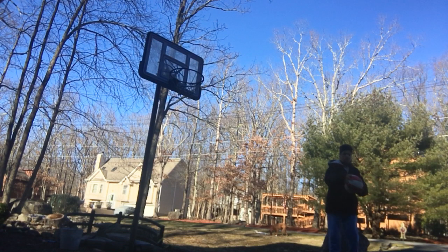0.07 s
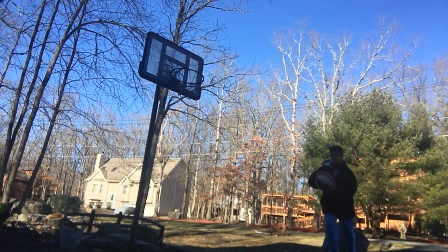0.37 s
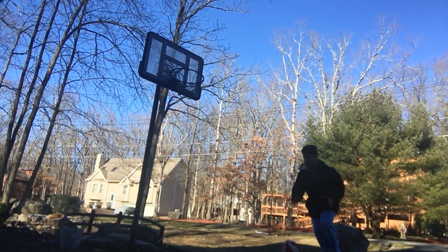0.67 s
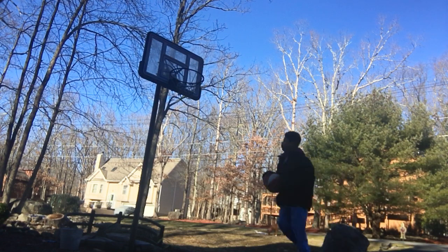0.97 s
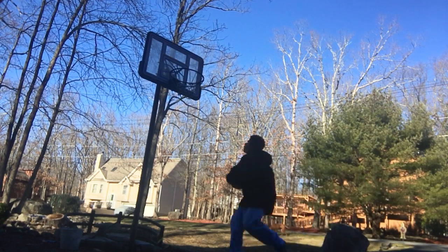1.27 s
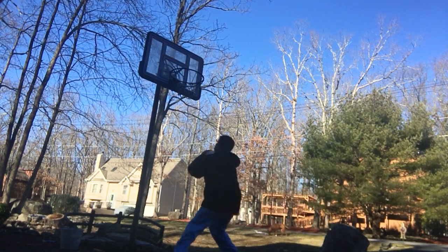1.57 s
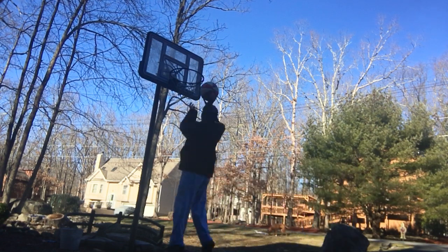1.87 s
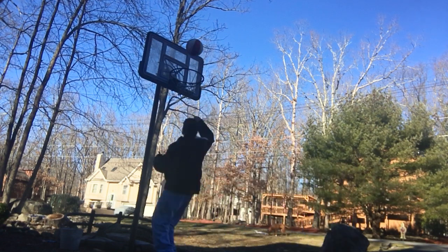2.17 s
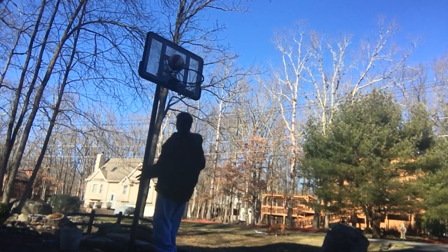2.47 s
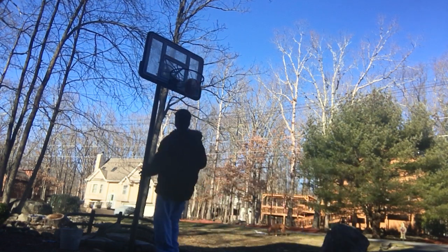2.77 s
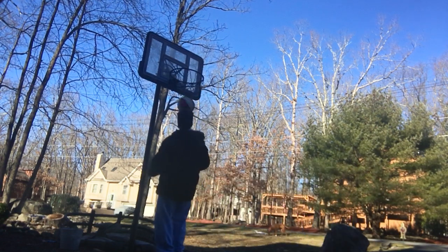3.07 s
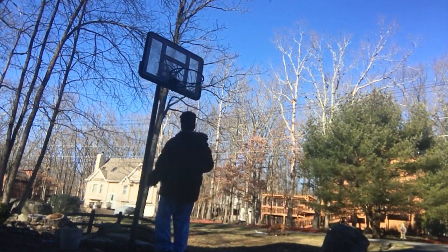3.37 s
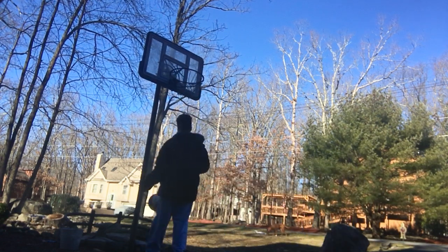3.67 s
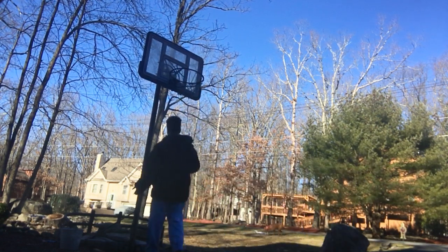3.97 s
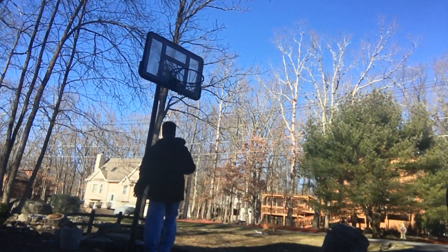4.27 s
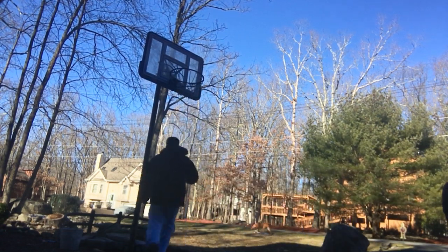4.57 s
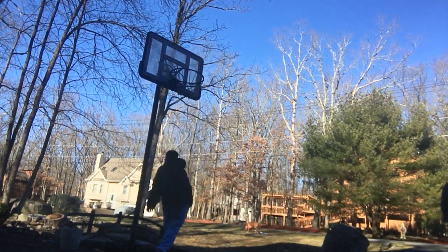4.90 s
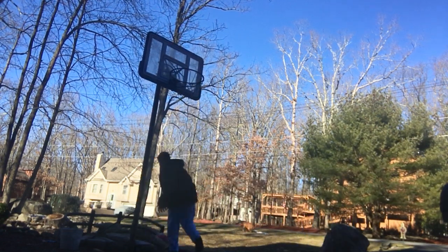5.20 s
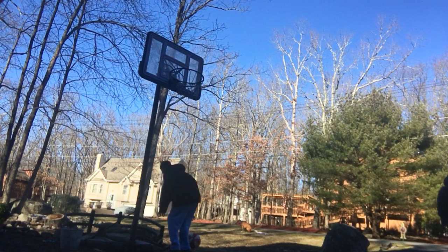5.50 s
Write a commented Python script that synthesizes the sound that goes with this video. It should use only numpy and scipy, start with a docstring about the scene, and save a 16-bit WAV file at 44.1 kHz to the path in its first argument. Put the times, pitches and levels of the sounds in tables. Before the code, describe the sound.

Low wind rumbles and buffets the microphone in a quiet yard, strongest in the first two seconds and then easing. At about 0.7 seconds a basketball bounces once on the driveway, the loudest sound: a sharp rubber slap with an airy ping and a thump. Faint shoe scuffs, hand pats on the ball and jacket rustle follow, with two barely audible bird chirps near 1.4 and 2 seconds. At 2.5 seconds the ball booms on the backboard, rattling the bracket and leaving the rim humming faintly. The net swishes softly at 2.8 seconds. The ball bounces on the ground at 3.6 seconds and again, softer and duller, at 4.5. From 5.1 to 5.4 seconds it knocks several times against the hoop's hollow plastic base with a twangy clatter, followed by light gritty scuffs. Each impact leaves a short outdoor echo.

```python
"""Wind buffets the microphone, shoes scuff on a gritty driveway and a basketball is bounced and caught.
A lay-up booms on the backboard and swishes through the net; the ball bounces twice more and knocks
against the hoop's hollow plastic foot. Each bounce is a slap of rubber, a ping of the air inside and
a thump of the shell. A jacket rustles, the woods hush, a far bird whistles, house and trees echo."""
import sys
import numpy as np
from scipy import signal
from scipy.fft import rfft, irfft
from scipy.io import wavfile
from scipy.ndimage import uniform_filter1d

SR = 44100
rng = np.random.default_rng(int(sys.argv[2]) if len(sys.argv) > 2 else 0)


def waveform_to_disk(signal):
    """Save audio, clipped to [-1, 1], as 16-bit WAV at the path in sys.argv[1]."""
    frames = np.transpose(np.atleast_2d(signal))
    scaled = np.clip(frames, -1, 1) * 32767
    samples = np.round(scaled).astype(np.int16)
    wavfile.write(sys.argv[1], SR, samples)


N = 244314
TIME = np.arange(N) / SR
AGE = TIME[:SR // 2]  # seconds into one short event
MIDDLE = AGE.mean()


def amp(db):
    """Turns decibels into a gain."""
    return 10 ** (np.asarray(db) / 20)


def unit(x):
    """Scales to an average (rms) level of 1."""
    return x / np.sqrt(np.mean(x ** 2) + 1e-20)


def read(points, hz):
    """Reads between a table's rows on a log-frequency axis."""
    f, value = np.transpose(points)
    return np.interp(np.log(hz + 1), np.log(f + 1), value)


def add(mix, s, sound):
    """Mixes a sound in at s seconds."""
    start = round(s * SR)
    sound = sound[max(-start, 0):]
    part = mix[max(start, 0):][:len(sound)]
    part += sound[:len(part)]


def bins(size=len(AGE)):
    """The frequencies of a spectrum, in Hz."""
    return np.fft.rfftfreq(size, 1 / SR)


def coloured(x, gain):
    """Filters x with one gain per frequency, then scales it to level 1."""
    return unit(irfft(rfft(x) * gain, len(x)))


def white(size=len(AGE)):
    """Plain white noise."""
    return rng.standard_normal(size)


def noise(spectrum, size=len(AGE)):
    """Noise with the given spectrum."""
    return coloured(white(size), amp(read(spectrum, bins(size))))


def grains(spread_db, size=len(AGE)):
    """Dense tiny clicks of uneven size."""
    clicks = white(size) * amp(spread_db * np.minimum(rng.exponential(1, size), 4))
    return clicks * (rng.random(size) < .1)


def fade(t60):
    """Dies away by 60 dB in t60 seconds, the fade time."""
    return np.exp(-np.log(1000) * AGE / t60)


def attack(rise):
    """Climbs from 0 towards 1, most of the way in rise seconds."""
    return 1 - np.exp(-AGE / rise)


def swell(half_length, middle=MIDDLE, time=AGE):
    """A bell-shaped rise and fall in level."""
    return np.exp(-.5 * ((time - middle) / half_length) ** 2)


def ring(tones, rise, uneven_db=0, scatter=0):
    """Dying tones; uneven_db and scatter vary their strength and phase from blow to blow."""
    chance = rng.standard_normal((len(tones), 2))
    out = sum(amp(db + uneven_db * a) * fade(t60) * np.sin(2 * np.pi * hz * AGE + scatter * b)
              for (hz, db, t60), (a, b) in zip(tones, chance))
    return out * attack(rise)


def click(gain):
    """A sudden (minimum-phase) click with the given spectrum and a peak of 1."""
    log_gain = np.log(np.maximum(gain, 1e-5))
    mirrored = np.r_[log_gain, log_gain[-2:0:-1]]
    pulse = np.fft.ifft(np.exp(np.conj(signal.hilbert(mirrored)))).real
    return pulse / abs(pulse).max()


def patchy(x, depth_db, size):
    """Lets the level wander in small patches of time and frequency."""
    bands = signal.stft(x, SR, nperseg=512)[2]
    patches = uniform_filter1d(white(bands.shape), size, axis=0)
    patches = unit(uniform_filter1d(patches, size, axis=1))
    return unit(signal.istft(bands * amp(depth_db * patches), SR, nperseg=512)[1][:len(x)])


def echoed(x, tail):
    """Smears x through a tail of echoes."""
    return signal.fftconvolve(x, tail / np.linalg.norm(tail))[:N]


def snap(pitch_hz):
    """One short dry snap around a pitch."""
    octaves = np.log2((bins() + 1) / pitch_hz)
    return coloured(white(), 1 / (1 + (1.74 * octaves) ** 4)) * (fade(0.0069) + 0.049 * fade(0.133))


# The hush of the woods. Each row: frequency in Hz, relative level in dB.
WOODS_COLOUR = [(88, -29.5), (150, -9.5), (253, -1.5), (320, -12), (411, -6), (471, -16), (985, -11.5),
                (1630, -22), (3410, -29), (9360, -37.5), (10300, -41.5), (13300, -38.5), (15500, -45)]
# How the whine comes and goes. Each row: time in seconds, share of its full level.
WHINE_LEVELS = [(.4, 0.076), (.9, 1), (2.0, 1), (2.5, 0)]

def woods(hush_db=-70.5, whine_hz=1178, whine_width_hz=20, whine_db=-76.5):
    """A steady distant hush and a faint far whine."""
    hush = amp(hush_db) * noise(WOODS_COLOUR, N)
    whine = coloured(white(N), np.exp(-((bins(N) - whine_hz) / whine_width_hz) ** 2))
    return hush + amp(whine_db) * whine * np.interp(TIME, *np.transpose(WHINE_LEVELS))


# Bird calls. Each row: start and length in seconds, first and last pitch in Hz, level in dB.
BIRD_CALLS = [(1.44, 0.034, 2140, 2220, -73), (2.037, .085, 2050, 3200, -72)]

def bird():
    """Two thin rising whistles from the trees."""
    out = np.zeros(N)
    for s, length, start_hz, end_hz, db in BIRD_CALLS:
        hz = np.linspace(start_hz, end_hz, round(length * SR))
        add(out, s, amp(db) * np.hanning(len(hz)) * np.sin(2 * np.pi * np.cumsum(hz) / SR))
    return out


# The wind's rumble. Each row: frequency in Hz, relative level in dB.
RUMBLE_COLOUR = [(20, -30.5), (35, -2.5), (55, 11), (80, 8), (120, 1.5), (170, -7.5), (250, -20),
                 (400, -31.5), (900, -69)]
# Gusts. Each row: time of the peak in seconds, level in dB, half length in seconds.
WIND_GUSTS = [(0.12, -39, 0.12), (0.732, -36, 0.05), (1.255, -42, .13), (2.5, -49, .15)]
# The hardest swirls of air. Each row: time of the peak in seconds, level in dB, upper edge in Hz.
WIND_BUFFETS = [(.114, -39, 217), (.182, -34, 190), (.675, -36, 135), (.782, -40, 198), (1.028, -39, 196),
                (1.142, -33.5, 186), (1.224, -38.5, 137), (1.343, -38, 200), (1.392, -36, 238),
                (1.563, -40.5, 127), (1.604, -38, 139), (1.674, -42.5, 128), (1.917, -47.5, 133),
                (2.393, -42.5, 147)]

def wind(breeze_db=-51, fall_db_per_s=2.16, lumpy_db=3.0, low_hz=54, half_length_cycles=1.85):
    """Air swirls at the microphone: a dying breeze rumbles, with gusts and short buffets on top."""
    lumps = coloured(white(N), np.exp(-(bins(N) / 18) ** 2))
    breeze_power = amp(breeze_db - fall_db_per_s * TIME) ** 2
    gust_power = sum((amp(db) * swell(half, s, TIME)) ** 2 for s, db, half in WIND_GUSTS)
    rumble = unit(noise(RUMBLE_COLOUR, N) * amp(lumpy_db * lumps))
    out = np.sqrt(breeze_power + gust_power) * rumble
    hz = bins()
    bass = (hz / low_hz) ** 3 / (1 + (hz / low_hz) ** 3) / np.sqrt(1 + hz / 70)
    for s, db, edge_hz in WIND_BUFFETS:
        shape = swell(half_length_cycles / edge_hz)
        eddy = shape * coloured(white(), bass / (1 + (hz / edge_hz) ** 4.5))
        add(out, s - MIDDLE, amp(db) * eddy * np.linalg.norm(shape) / np.linalg.norm(eddy))
    return out


# How long the yard echoes. Each row: frequency in Hz, fade time in seconds.
YARD_FADES = [(100, 0.66), (400, 0.33), (1000, 0.2), (3000, 0.27), (6000, 0.26), (12000, 0.176)]
# The tone of that echo. Each row: frequency in Hz, relative level in dB.
ECHO_COLOUR = [(60, -11.5), (250, 0), (600, 1.5), (1200, -4.5), (3200, -4), (6000, -3.5), (12000, -2)]

def yard_echo(x, echo_db=-16):
    """Scattered echoes from the house and the trees, each band dying at its own speed."""
    hz, t, bands = signal.stft(white(), SR, nperseg=256)
    bands = bands * np.exp(-np.log(1000) * t / read(YARD_FADES, hz)[:, None])
    bands *= amp(read(ECHO_COLOUR, hz))[:, None]
    tail = signal.istft(bands, SR, nperseg=256)[1][:len(AGE)] * attack(0.01)
    return amp(echo_db) * echoed(x, tail)


# Dry leaves, also used for cloth. Each row: frequency in Hz, relative level in dB.
RUSTLE_COLOUR = [(300, -4.5), (1100, 0.5), (2000, -1.5), (3700, -4.5), (5000, -13.5), (7000, -18),
                 (10000, -24.5), (15000, -25.5)]

def tree_echo(x, echo_db=-35):
    """A faint late echo comes back from the trunks and dry leaves."""
    return amp(echo_db) * echoed(x, noise(RUSTLE_COLOUR) * fade(0.8) * attack(0.028))


# When the player moves. Each row: start and end in seconds, rustle level in dB.
PLAYER_MOVES = [(0, 0.12, -78.5), (.55, 2.3, -79), (4.95, 6.1, -84.5)]

def jacket(leaves_db=-85, ease_s=0.058, snaps_per_s=4, snap_db=-70.5, snap_hz=3500):
    """Cloth rustles and grit snaps faintly while the player moves; in between, dry leaves stir."""
    level, snaps = amp(leaves_db), np.zeros(N)
    for start, end, db in PLAYER_MOVES:
        seconds_outside = np.maximum(np.maximum(start - TIME, TIME - end), 0)
        level = level + amp(db) * np.exp(-seconds_outside / ease_s)
    fibres = coloured(grains(spread_db=2.0, size=N), amp(read(RUSTLE_COLOUR, bins(N))))
    rustle = level * patchy(fibres, depth_db=1.6, size=4)
    for start, end, _ in PLAYER_MOVES:
        for _ in range(round(snaps_per_s * (end - start))):
            extra_db, octaves = rng.normal(0, [3, .6])
            add(snaps, rng.uniform(start, end), amp(snap_db + extra_db) * snap(snap_hz * 2 ** octaves))
    return rustle + snaps


# A scrape. Each row: frequency in Hz, relative level in dB.
SCRAPE_COLOUR = [(200, -4), (1000, 3), (2200, 0), (4000, 0.5), (6000, -5.5), (9000, -9.5), (10500, -14.5),
                 (13000, -15), (16000, -19)]

def scrape(tilt_db):
    """Grainy rubbing, brighter with more tilt."""
    colour = amp(read(SCRAPE_COLOUR, bins()) + tilt_db * np.log2(bins() + 1))
    return patchy(coloured(grains(spread_db=2.0), colour), depth_db=3.0, size=3)


# A dull knock, for pats and the hoop's bracket. Each row: frequency in Hz, relative level in dB.
KNOCK_COLOUR = [(80, 2), (250, 11.5), (450, 1), (850, 1.5), (1400, -13), (2500, -21.5), (6000, -35),
                (15000, -57)]
# Soles landing, hands patting and catching the ball. Each row: start in seconds, relative pat level
# in dB, length in seconds, scuff level in dB, scuff tilt in dB per octave.
PATS = [(0.021, -55, 0.037, -74.5, -1), (0.419, -61, 0.028, -64.5, -3), (.48, -59.5, .055, -78, -8),
        (0.896, -51.5, .028, -61, -1), (0.949, -63, 0.056, -68, -0.5), (1.396, -57, 0.068, -73, -3),
        (1.548, -58.5, 0.035, -65, 2), (1.794, -54, 0.074, -58, -2.5), (2.097, -57.5, .03, -69, -3),
        (3.349, -67.5, .05, -88, -6), (3.852, -61.5, 0.023, -90, -3), (3.949, -56, 0.022, -77, -4.5),
        (4.948, -57.5, 0.046, -79, -3.5)]
# A shoe drags or a sleeve brushes. Each row: middle in seconds, level in dB, half length in seconds,
# tilt in dB per octave.
DRAGS = [(1.221, -69.5, 0.0075, 1), (1.719, -66.5, .029, -0.5), (2.249, -72, 0.067, 1.2),
         (4.423, -65, 0.011, 1.3), (5.362, -64.5, 0.011, 1), (5.458, -58, 0.0048, -2.5),
         (5.515, -64.5, 0.016, -3)]
# Grit underfoot and hands smacking the ball. Each row: start in seconds, level in dB, pitch in Hz.
SNAPS = [(0.024, -59, 1800), (.421, -62.5, 1500), (.513, -52.5, 1940), (.902, -56.5, 1080),
         (1.711, -59, 5100), (1.822, -53, 1400), (2.105, -56, 990), (2.9537, -52, 4900), (3.235, -63, 1980),
         (3.842, -56, 5650), (4.424, -51.5, 3900), (5.407, -52.5, 3380)]

def shoes_and_hands(scuff_peak=0.38, scuff_width=0.31):
    """Soles on grit and hands on the ball make dull pats, scuffs and short dry snaps."""
    out = np.zeros(N)
    for s, pat_db, length, scuff_db, tilt_db in PATS:
        pat_shape = attack(0.1 * length) * np.exp(-AGE / (0.57 * length))
        add(out, s, amp(pat_db + 5) * noise(KNOCK_COLOUR) * pat_shape)
        scuff = swell(scuff_width * length) * scrape(tilt_db)
        add(out, s + scuff_peak * length - MIDDLE, amp(scuff_db) * scuff)
    for s, db, half_length, tilt_db in DRAGS:
        add(out, s - MIDDLE, amp(db) * swell(half_length) * scrape(tilt_db))
    for s, db, pitch_hz in SNAPS:
        add(out, s, amp(db) * snap(pitch_hz))
    return out


# The net's swish. Each row: frequency in Hz, relative level in dB.
NET_COLOUR = [(200, -8.5), (600, -7.5), (950, 0.5), (1140, 2), (1400, 0.5), (1700, -7.5), (2200, -10),
              (3200, -18), (7000, -27.5), (9000, -27), (10500, -27), (13000, -28), (16000, -39)]

def net(s=2.773, db=-53.0):
    """The ball drags through the cords."""
    out = np.zeros(N)
    add(out, s - MIDDLE, amp(db) * swell(half_length=0.018) * noise(NET_COLOUR))
    return out


# Knocks on the hoop's foot. Each row: start in seconds, then relative clatter, thud and twang in dB.
FOOT_KNOCKS = [(5.1423, -44.5, -41.5, -68), (5.166, -50.5, -42, -48.5), (5.191, -45, -47.5, -50),
               (5.2205, -50, -41.5, -65), (5.3124, -40, -61, -35.5), (5.41, -66, -46.5, -47)]
# The hollow foot. Each row: pitch in Hz, relative level in dB, fade time in seconds.
FOOT_TONES = [(71, -5, 0.11), (134, 1.5, 0.092), (201.3, -4, 0.093), (282, -9, 0.085), (383, -17.5, 0.13)]
# Clattering plastic. Each row: frequency in Hz, relative level in dB.
CLATTER_COLOUR = [(150, 2.5), (400, -3.5), (650, -9), (1050, 3.5), (1800, -9.5), (2500, -5), (3300, -18.5),
                  (4400, -16), (6000, -31), (15000, -42.5)]

def hoop_foot(start_hz=2200, fall_s=0.00087):
    """The ball knocks on hollow plastic; bending waves arrive by many paths as a rough twang."""
    out = np.zeros(N)
    # high bending waves travel faster and arrive first, so the pitch sinks
    turns = np.cumsum(start_hz / np.sqrt(1 + AGE / fall_s)) / SR
    falling_tone = np.sin(2 * np.pi * turns) * fade(0.32)
    clatter_shape = (fade(0.026) + 0.31 * fade(0.24)) * attack(0.00039)
    for s, clatter_db, thud_db, twang_db in FOOT_KNOCKS:
        add(out, s, amp(clatter_db) * noise(CLATTER_COLOUR) * clatter_shape)
        add(out, s, amp(thud_db + 3) * ring(FOOT_TONES, rise=0.0049, uneven_db=4.5, scatter=0.76))
        paths = white() * fade(0.096)
        add(out, s, amp(twang_db - 6.5) * echoed(falling_tone, paths))
    return out


# The lay-up. Each row: start in seconds, then relative crack, board, bracket and rim levels in dB.
LAYUP_HITS = [(2.4947, -45, -36, -53, -71), (2.5174, -59, -32, -44.5, -61.5),
              (2.5246, -71, -28.5, -36, -56.5), (2.5694, -72.5, -43, -36, -67), (2.627, -64, -56, -60, -61),
              (2.861, -96, -61, -52, -56.5), (2.919, -84, -72, -57, -56)]
# The hoop's three ringing parts. Each row: pitch in Hz, relative level in dB, fade time in seconds.
BOARD_TONES = [(54.2, -8, 0.19), (76.6, -3.5, .13), (105.3, 3, 0.071), (170, -6.5, 0.11), (266, -12, 0.073),
               (346, -6, 0.065), (394, -14.5, 0.084)]
BRACKET_TONES = [(646.6, -17.5, 0.24), (768, -12, 0.038), (1042, -2, 0.046), (1163, 1.5, 0.036),
                 (1295, -8, 0.07), (1418, 5, 0.027), (1530, -3.5, 0.045), (2114, -16.5, 0.059)]
RIM_TONES = [(280, -15.5, 1.9), (348, -3.5, 0.24), (371, 6, 0.12)]
# The ball's crack on board or grit. Each row: frequency in Hz, relative level in dB.
CRACK_COLOUR = [(200, -17.5), (1000, 6), (3200, -0.5), (5000, -14), (7500, -12), (10000, -20.5),
                (15000, -34.5)]

def hoop(roughness=0.37):
    """The ball cracks on the board, which booms and shakes its loose bracket; the rim hums on."""
    out = np.zeros(N)
    for s, crack_db, board_db, bracket_db, rim_db in LAYUP_HITS:
        add(out, s, amp(crack_db) * noise(CRACK_COLOUR) * (fade(0.01) + 0.3 * fade(0.2)))
        add(out, s, amp(board_db) * ring(BOARD_TONES, rise=0.0026, uneven_db=4.5, scatter=0.77))
        chatter = 1 + roughness * unit(uniform_filter1d(white(), size=90))
        rattle = chatter * ring(BRACKET_TONES, rise=0.0014, uneven_db=5.0, scatter=2.1)
        clatter = noise(KNOCK_COLOUR) * fade(0.31) * attack(0.0036)
        add(out, s, amp(bracket_db - 5) * rattle + amp(bracket_db - 17) * clatter)
        add(out, s, amp(rim_db) * ring(RIM_TONES, rise=0.0064, scatter=0.46))
    return out


# The rubber's slap. Each row: frequency in Hz, relative level in dB.
SLAP_COLOUR = [(100, -2), (500, -11.5), (1000, -3.5), (2000, 2), (3300, 5), (4500, -3), (6000, -3),
               (8000, -15), (9000, -16), (11000, -31), (15000, -22)]
# The air inside the ball, then the shell overtones that a hard throw stirs.
# Each row: pitch in Hz, relative level in dB, fade time in seconds.
AIR_TONES = [(630, -7, 0.1), (702, -2.5, 0.084), (786, -1, 0.0583), (970, -0.5, 0.095), (1070, -8.5, 0.059),
             (1186, 2, 0.074), (1340, -8.5, 0.071), (1560, -3.5, 0.12), (1760, -4, .05), (1940, -16, .045),
             (2060, -14.5, 0.16), (2215, -10, 0.039), (2633, 1, .045), (2800, -4.5, .055),
             (2880, -9, 0.044), (3236, -10.5, .05), (3490, -11.5, .035), (3820, -3, .03),
             (4150, -14, 0.0535), (5350, -15.5, .04), (5780, -18, .025)]
OVERTONES = [(254.4, -1.5, 0.11), (268.7, -4.5, 0.0878)]
# The shell. Each row: multiple of the thump pitch, relative level in dB, fade time in seconds.
SHELL_TONES = [(.5, -14.5, 0.19), (.78, -14.5, 0.072), (1, -0.5, 0.079), (1.1, -11, 0.07), (2.0, -28, 0.24),
               (2.6, -9.5, 0.047), (3.2, -16.5, 0.078)]
# Bounces. Each row: start in seconds, slap in dB, treble edge in Hz, relative air ping in dB, thump in
# dB, its pitch in Hz, two slap echo delays in seconds, smack in dB, its pitch in Hz, overtones in dB.
BALL_BOUNCES = [(0.6898, -14.5, 4630, -34, -22, 116, .00186, 0.0024, -26, 980, -25),
                (3.566, -21, 6800, -38.5, -22, 125.2, 0.00195, .00405, -30.5, 1440, -40.5),
                (4.5269, -30, 2760, -42, -26.5, 124.8, 0.002545, 0.0043, -25, 1120, -41)]

def ball(thump_delay_s=0.0015):
    """Rubber slaps the ground, the slap echoes in the ball, the air inside pings, the shell thumps."""
    out = np.zeros(N)
    for (s, slap_db, edge_hz, ping_db, thump_db, thump_hz,
         delay, second_delay, smack_db, smack_hz, overtone_db) in BALL_BOUNCES:
        # a soft landing has less treble in both its slap and its ping
        softness = 1 / np.sqrt(1 + (bins() / edge_hz) ** 4)
        colour = amp(read(SLAP_COLOUR, bins())) * softness
        slap = amp(slap_db) * click(colour)
        for lag, share in ((0, 1), (delay, 0.44), (second_delay, 0.23)):
            add(out, s + lag, share * slap)
        scattered_slap = coloured(white(), colour) * fade(0.053)
        add(out, s + delay / 2, amp(slap_db - 19) * scattered_slap)
        ping = ring(AIR_TONES, rise=0.00062, uneven_db=2, scatter=0.37)
        add(out, s, amp(ping_db - 3) * irfft(rfft(ping) * softness ** 2))
        # the flattening patch crushes grit and smacks a moment after first touch
        add(out, s, amp(thump_db - 26) * noise(CRACK_COLOUR) * fade(0.0444))
        add(out, s + delay, amp(smack_db) * ring([(smack_hz, 0, 0.012)], rise=.0001))
        shell = [(multiple * thump_hz, db, t60) for multiple, db, t60 in SHELL_TONES]
        add(out, s + thump_delay_s, amp(thump_db) * ring(shell, rise=0.0028))
        add(out, s + thump_delay_s, amp(overtone_db) * ring(OVERTONES, rise=0.0029))
    return out


def scene():
    """The game and the bird with their echoes, over wind, woods and jacket."""
    direct = ball() + hoop() + net() + hoop_foot() + shoes_and_hands() + bird()
    return (direct + yard_echo(direct) + tree_echo(direct) + wind() + woods() + jacket())[None]


def record(dry, low_cut_hz=34, high_cut_hz=15780):
    """The microphone loses the deepest bass, and the highest treble is cut off."""
    bass_cut = signal.butter(3, low_cut_hz, "highpass", fs=SR, output="sos")
    treble_cut = signal.firwin(511, high_cut_hz, window=("kaiser", 9), fs=SR)
    return signal.oaconvolve(signal.sosfilt(bass_cut, dry), treble_cut[None], "same")


dry = scene()
out = record(dry)
waveform_to_disk(out)
```